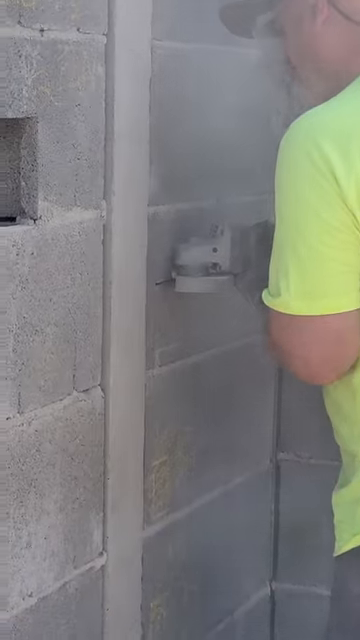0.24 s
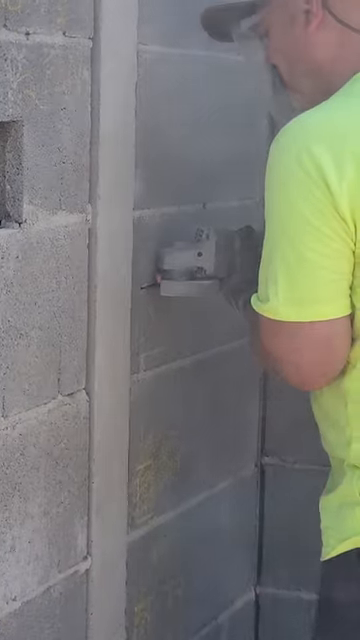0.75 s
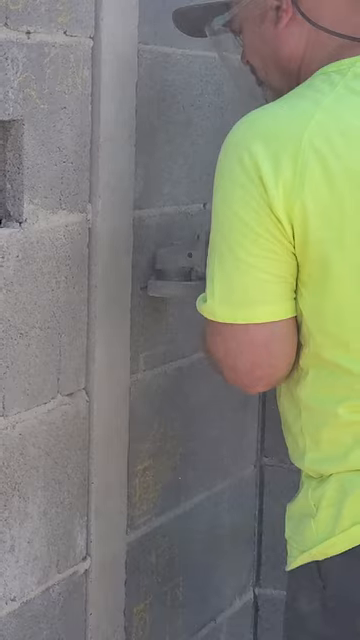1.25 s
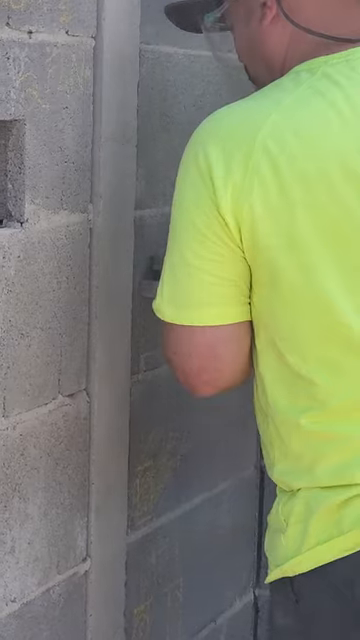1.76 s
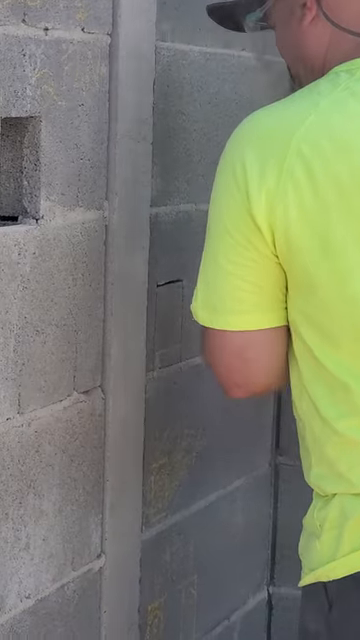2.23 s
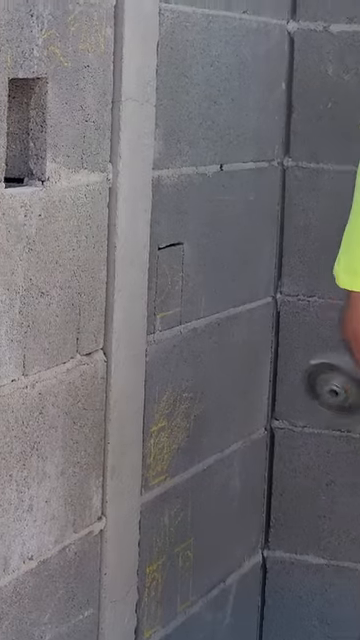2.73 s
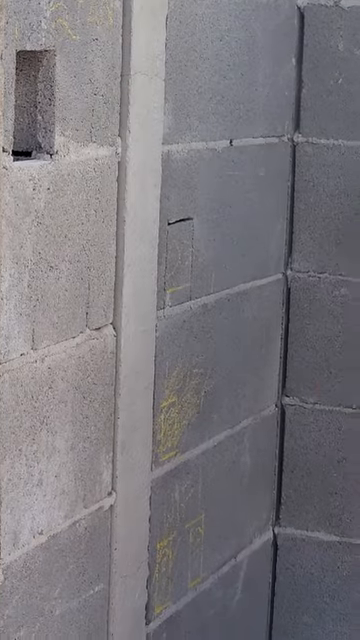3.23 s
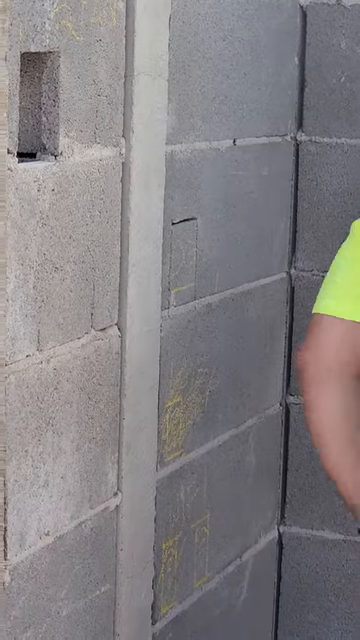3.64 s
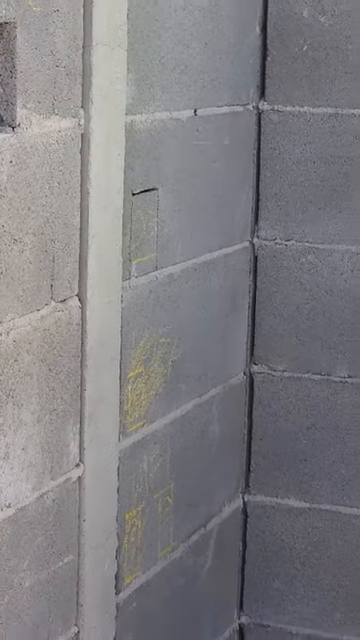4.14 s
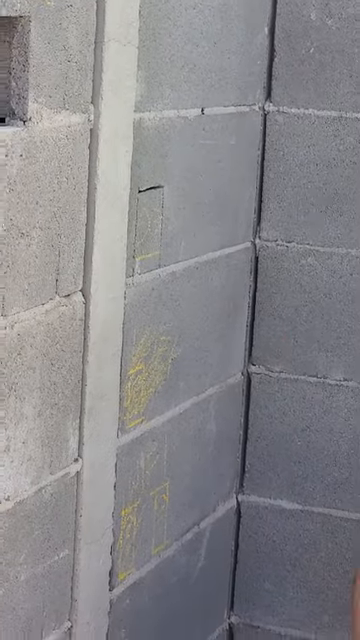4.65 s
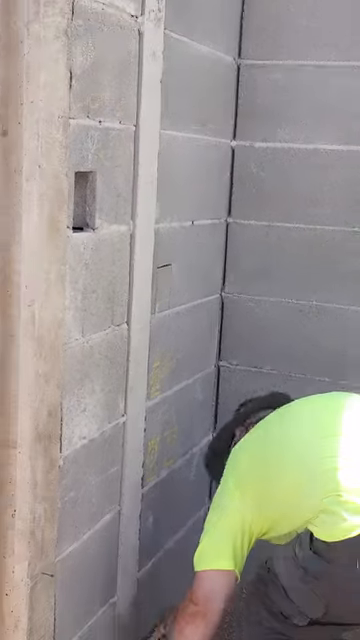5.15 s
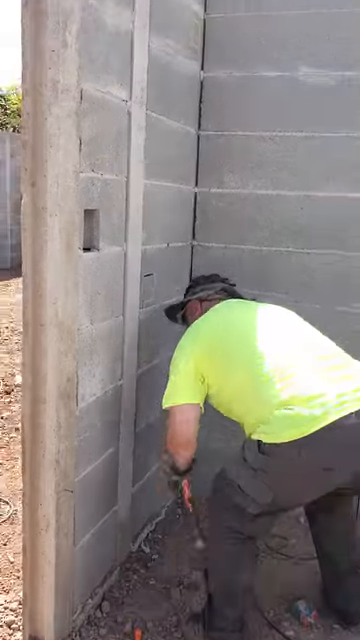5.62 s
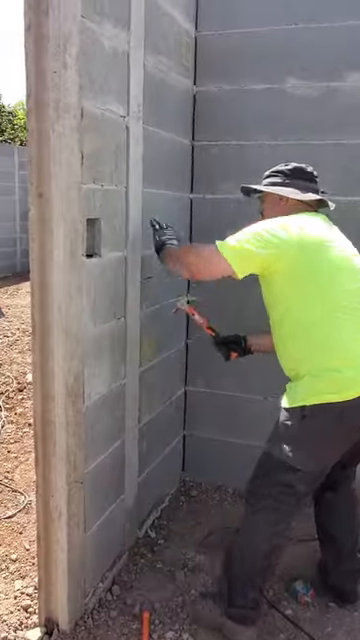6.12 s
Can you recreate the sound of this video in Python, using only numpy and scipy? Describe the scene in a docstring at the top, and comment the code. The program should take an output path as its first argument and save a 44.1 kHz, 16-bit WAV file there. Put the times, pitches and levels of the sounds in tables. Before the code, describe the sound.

From the start an angle grinder bites into concrete: a loud, gritty, high metallic screech with ragged squeal, pressed in uneven pushes until about 1.9 seconds, above a rushing motor. Power goes off near 1.7 seconds; the disc leaves the slot and the motor coasts down, its airy whirr, gear rattle and howl sinking and fading through the rest. Hard knocks land at irregular moments, early ones partly under the cutting, clearer ones around 2.1, 2.4, 3.5, 3.9, 4.4, 5.2 and 5.6 seconds; those near 3.5, 4.4 and 5.2 set steel ringing. Tiny sharp pings tick unevenly close to the microphone, loudest from 2.2 to 3 seconds, higher-pitched around 4.3 to 5, then sparse. A hand tool clinks twice on stony ground near 5.4 seconds. Low wind gusts bump the microphone throughout, over faint yard hush, with short hard-wall reflections.

```python
"""In an unroofed corner of block walls, an angle grinder cuts a slot in concrete, then coasts down.
The cut is noise ringing the disc's resonances; the motor is air noise, gear rattle and tones that sink.
Hard, close knocks are short bursts of filtered noise; some set steel ringing, and a hand tool clinks.
Uneven ticking is made of tiny pings close to the microphone. Gusts of low noise bump it, over a yard hush.
Delayed copies and random reflections make the echo of the walls."""
import sys
import numpy as np
from scipy import signal
from scipy.fft import rfft, irfft, next_fast_len
from scipy.io import wavfile
from scipy.ndimage import map_coordinates

SR = 44100
rng = np.random.default_rng(int(sys.argv[2]) if len(sys.argv) > 2 else 0)


def bounce(signal):
    """Save signal as a 16-bit WAV file at the path given by the first command-line argument."""
    frames = np.transpose(np.atleast_2d(signal))
    limited = np.clip(frames, -1, 1)
    pcm = np.round(limited * 32767).astype(np.int16)
    wavfile.write(sys.argv[1], SR, pcm)


N = 281358
TIME = np.arange(N) / SR
# added to the left channel and taken from the right, to widen a sound
OPPOSITE = np.array([[1], [-1]])

# All levels are relative: later gains still set the mix. A "t60" is the time to fall by 60 dB.
# Resonances of the disc in the cut. Each row: pitch in Hz, width in Hz, level in dB.
DISC_MODES = [(3060, 40, -8), (3840, 100, -1), (4020, 150, -10), (4382, 50, -3.5), (4931, 20, 6.5),
              (5873, 150, -9), (7045, 110, -2.5), (8253, 40, -7), (8600, 250, -15), (8995, 14, 2),
              (9690, 18, 1), (10880, 14, 0), (11359, 70, -5), (11854, 100, -12), (12893, 40, -9),
              (13830, 320, -13)]
# Spectrum of the breaking grit. Each row: frequency in Hz, level in dB per Hz.
GRIT_SPECTRUM = [(1180, -16.5), (2000, -10), (2730, -12), (3050, 9), (3570, -15), (3860, 2.5), (4590, -11),
                 (4910, 8.5), (5500, -7), (9310, -0.5), (10200, -7.5), (11700, 0.5), (15800, -12.5)]
# The disc is pushed into the slot. Each row: start in seconds, length in seconds,
# bite in dB, treble in dB relative to the bite.
PUSHES = [(-0.05, 0.45, -19.5, -3), (0.385, 0.24, -22, -4.5), (0.735, 0.091, -21, 0.5),
          (0.951, 0.041, -20.5, -1), (1.02, 0.41, -23.5, -4), (1.257, 0.33, -21.5, -1),
          (1.565, 0.15, -23, -4), (1.714, 0.1, -27, -6), (1.86, 0.092, -29, -1)]
PUSH_ATTACK_S, PUSH_T60_S = 0.056, 0.28
# Between pushes the disc only rubs; then it is drawn out of the slot. Treble is relative to the rub.
RUB_DB, RUB_TREBLE_DB = -28.5, -5.5
DRAW_OUT_S, DRAW_OUT_T60_S = 1.76, 1.5
# The squeal of the disc's strongest mode bends with the load. Each row: time in seconds,
# pitch in Hz, level in dB.
SQUEAL_CURVE = [(0.0, 3820, -16), (0.352, 3824, -19), (0.428, 3820, -31), (0.858, 3840, -20.5),
                (0.928, 3830, -47), (1.042, 3844, -21), (1.111, 3855, -32), (1.378, 3845, -14),
                (1.846, 3860, -21), (1.878, 3850, -41), (1.928, 3850, -29), (1.949, 3800, -34)]
# The screech reaches the left microphone first.
SCREECH_LEAD_S = 0.00048

# Armature speed in turns per second under power, and the moment it is switched off.
RUN_HZ, SWITCH_OFF_S = 508, 1.68
# Speed lost to bearing friction each second, and the speed at which the fan's drag equals it.
FRICTION_HZ_PER_S, DRAG_EQUAL_HZ = 37.1, 304
# Motor tones. Each row: multiple of the armature speed, level in dB, flicker in dB.
WHINE_TONES = [(1, -19, 3), (2, -21, 4), (4, -20, 4), (18, -4, 3.2)]
# Ragged strands of the gear howl. Each row: multiple of the armature speed, level in dB at full speed,
# level in dB at half speed, width as a share of the pitch.
HOWL_STRANDS = [(.9, -14, -26, .04), (3.3, -11, -22, .012), (6.2, -28, -10, .012), (7.05, -13, -21, .008),
                (9.6, -9, -18, .008), (11, -9, -13, .014), (12.1, -22, -10, .014), (18.15, -26, -14, .006)]
# Cooling air and gears as the tool is moved about. Each row: time in seconds, level of the highs in dB,
# level of the lows in dB.
AIR_LEVELS = [(0.0, -30.5, -35), (0.43, -33.5, -34.5), (0.76, -29, -33.5), (1.22, -29, -31),
              (1.51, -35, -36), (2.36, -33.5, -38.5), (2.88, -32, -39.5), (3.2, -36.5, -39),
              (3.39, -37, -36.5), (3.71, -33, -40.5), (4.03, -35, -39), (4.25, -38, -46.5),
              (4.36, -35, -50), (4.62, -39.5, -39), (4.74, -39, -47.5), (5.05, -46, -46.5),
              (5.58, -48, -49.5), (5.85, -50.5, -55), (6.38, -56.5, -57)]
# Spectrum of the air rush. Each row: frequency in Hz, level in dB per Hz.
AIR_SPECTRUM = [(150, -18), (400, 1), (560, -0.5), (800, -1.5), (1050, 7), (1300, 7), (1800, 2), (2600, 3),
                (4000, -6.5), (6000, -13), (9000, -11), (13000, -2), (16000, -27)]
# Spectrum of the fan's hiss at full speed. Each row: frequency in Hz, level in dB per Hz.
FAN_SPECTRUM = [(1500, -29), (4000, 2), (5500, 5.5), (7000, 4), (10000, -3), (13000, -7), (16000, -45)]
# Resonances of the housing and guard. Each row: pitch in Hz, width in Hz, level in dB.
HOUSING_MODES = [(790, 210, 1.5), (1400, 500, -4), (2480, 500, -4), (8450, 270, -24)]
# The gears' rattle at full speed. Each row: pitch in Hz, width in Hz, level in dB.
GEAR_MODES = [(1045, 200, -8.5), (1727, 230, 6), (2082, 150, 3), (2400, 110, 0), (3430, 150, 1),
              (4580, 630, 2.5)]
# The gears rattle more loosely as they slow: typical level swing near standstill.
RATTLE_DB = 2.5
# Fine ridges in the air rush: spacing at full speed, and typical depth.
RIDGE_HZ, RIDGE_DB = 60, 5.0
# Echo of the moving grinder off the nearest surface. Each row: time in seconds, lag in milliseconds,
# strength from 0 to 1.
NEAR_ECHO = [(0, 1.4, .35), (3.4, 1.52, .45), (3.6, .98, .35), (4.35, .75, .75), (4.7, .77, .8),
             (6.38, .85, .2)]
# Sound paths off the block walls. Each row: lag in milliseconds, strength (below 0 flips the wave).
WALL_ECHOES = [(1.85, -0.19), (7.3, 0.18), (12.6, 0.2)]

# Knocks on masonry. Each row: start in seconds, thud in dB, body in dB, crack in dB, sizzle in dB,
# top of the sizzle in Hz, length of the crunch in seconds, main resonance in Hz, its level in dB,
# low rumble after it in dB.
KNOCKS = [ (0.236, -17.5, -17.5, -30, -45, 8000, 0.013, 905, -36, -39),
          (0.457, -22, -28.5, -47, -56, 8000, 0.0053, 209, -33, -38),
          (0.593, -19, -20, -32, -50, 8000, 0.0035, 326, -22, -27),
          (1.455, -24.5, -35, -49, -56, 8000, 0.023, 240, -40, -37.5),
          (2.077, -10, -16.5, -28.5, -31, 7000, 0.008, 381, -29, -30.5),
          (2.367, -13, -20.5, -33, -24, 15000, 0.012, 258, -42, -27.5),
          (2.73, -50, -27.5, -38, -36, 8000, 0.033, 1230, -30, -38),
          (3.466, -17, -19.5, -27, -23, 14100, 0.019, 497, -33, -24.5),
          (3.881, -29, -14.5, -18.5, -22.5, 7900, 0.012, 932, -17.5, -33),
          (4.048, -44, -34, -37, -66, 5900, 0.0076, 774, -32, -60),
          (4.31, -22.5, -54, -56, -60, 6000, 0.0039, 130, -46, -58),
          (4.390, -19.5, -26.5, -34, -30, 14000, 0.028, 365, -32, -23.5),
          (4.734, -24, -45, -52, -58, 6000, 0.011, 290, -41, -53),
          (5.227, -32, -16.5, -36, -21, 14000, 0.011, 485, -30, -31),
          (5.626, -31, -17, -26.5, -34, 6500, 0.026, 1360, -30, -45)]
KNOCK_T60_S = 0.12
# Resonances of the knocked block. Each row: pitch in Hz, width in Hz, level in dB.
BLOCK_MODES = [(214, 79, 4), (313, 41, 7), (393, 74, 6.5), (480, 82, 0.5), (648, 61, 5.5), (946, 66, 7.5),
               (1134, 90, 2.5), (1272, 64, 6.5), (1381, 36, 6.5), (1525, 163, 4.5), (2080, 1350, -8.5)]
# High resonances of the knocked block. Each row: pitch in Hz, width in Hz, level in dB.
CRACK_MODES = [(1810, 120, -12.5), (1950, 32, -6), (2176, 41, 4), (2538, 41, 1.5), (2896, 92, 1.5),
               (3077, 29, 4.5), (3500, 84, -5)]
# Steel struck along with a knock. Each row: start in seconds, level in dB,
# extra damping by the contact in 1/s.
CLANGS = [(3.468, -26.5, 30), (4.393, -22, 0), (5.228, -24, 20)]
# Ringing modes of the steel. Each row: pitch in Hz, level in dB, t60 in seconds.
STEEL_MODES = [(1295, -8, .35), (1520, 2, 1.1), (1610, -4, .4), (1965, -13, .8), (2326, -18, .4),
               (2820, -13, .29), (3036, -0.5, .5), (3130, -9, .4), (3600, -1, .33), (4080, -4, .27),
               (4583, -7, .42), (5130, -13, .6), (5633, -3, .28), (6245, -1, .22), (6838, -3, .26),
               (7445, -11, .28), (8100, -11, .24), (8635, -9, .27), (9290, -12, .32), (12060, -10, .35),
               (12850, -14, .22), (13600, -13, .45)]
# A hand tool clinks on the stony ground. Each row: start in seconds, level in dB,
# tilt towards the high modes in dB per octave, length of the scuff in seconds.
CLINKS = [(5.408, -24.5, 8, 0.0063), (5.4524, -17, 0.5, 0.014)]
# What rings in a clink. Each row: pitch in Hz, width in Hz, level in dB.
CLINK_MODES = [(417, 210, -8), (1010, 550, -12), (1770, 160, -5), (2420, 130, -0.5), (2965, 80, 3.5),
               (3300, 68, 0), (3710, 120, -4), (4550, 380, -11), (5450, 120, -9), (5920, 88, -1),
               (6240, 220, -6), (7000, 120, -9.5), (8000, 420, -18), (11100, 1000, -27)]
CLINK_T60_S = 0.079

# How the scattered ticks change. Each row: time in seconds, peak in dB, treble in dB relative to it,
# share of ticks on the upper resonance from 0 to 1.
SCATTERED_TICKS = [(0, -45, 8, 0.1), (2.0, -36, 5.5, 0), (2.4, -21.5, -8, 0.07), (2.85, -20, -8, 0.1),
                   (3.2, -25, -10.5, 0.01), (3.7, -24, -9, 0.2), (4.3, -30, -2.5, 0.96),
                   (4.85, -30, -1, .95), (5.2, -37.5, 0, 0.62), (5.85, -33.5, -4.5, 0.3),
                   (6.38, -35.5, -5, 0.36)]
# Single ticks with set times, many of them loud. Each row: start in seconds, peak in dB, pitch in Hz,
# treble in dB relative to the peak.
SINGLE_TICKS = [(2.1914, -15, 4120, -19), (2.279, -14.5, 4040, -22), (2.507, -17.5, 3860, -18),
                (2.5332, -13.5, 3900, -27), (2.6199, -16.5, 3680, -11), (2.7023, -14, 4760, -9),
                (2.7521, -17, 4000, -13), (2.8512, -20, 3830, -13), (2.8973, -17, 3880, -9),
                (2.9524, -16, 4270, -19), (2.9814, -12, 3850, -25), (3.13, -21, 3790, -23),
                (3.7693, -28, 3630, -20), (3.8462, -22, 3730, -6), (4.002, -25, 4300, -6),
                (4.299, -27, 3770, -8), (4.799, -25, 5160, -18), (4.8294, -26, 5200, -13),
                (4.8663, -27, 5300, -5), (4.95, -21, 4700, -23), (4.9865, -25, 4980, -7),
                (5.0126, -22.5, 4040, -1), (5.036, -24.5, 4330, -10), (5.1166, -32, 5170, -3),
                (5.1921, -40, 5100, 5), (5.7658, -36, 3970, -11), (5.8591, -28.5, 3850, -19),
                (5.9678, -36, 3880, -5), (6.0815, -46, 3920, -10), (6.22, -42, 5140, -8),
                (6.249, -28.5, 3880, -11), (6.327, -40, 3980, -4)]
# Modes that ring along with every tick. Each row: pitch in Hz, level in dB, t60 in seconds.
TICK_MODES = [(3835, -4, 0.022), (4390, 1, 0.025), (5000, -11.5, 0.048), (8200, -15, 0.16),
              (9700, -4.5, 0.027), (10710, 4.5, 0.037), (11350, -0.5, 0.031), (12250, 2, 0.036)]
LOW_TICK_HZ, HIGH_TICK_HZ = 3890, 5114

# Gusts on the microphone. Each row: start in seconds, length in seconds, level in dB.
GUSTS = [(0.417, 0.07, -22), (0.517, 0.12, -20), (0.692, 0.1, -24.5), (0.896, 0.18, -30),
         (1.855, 0.28, -31), (2.406, 0.13, -34), (2.525, 0.083, -21), (3.236, 0.036, -23),
         (3.466, 0.59, -30), (4.114, 0.15, -23.5), (4.45, 0.19, -21.5), (4.91, 0.72, -33),
         (5.48, 0.3, -26.5), (5.991, 0.042, -26)]
GUST_ATTACK_S, GUST_T60_S, BREEZE_DB = 0.017, 0.27, -38.5
# Spectrum of the wind. Each row: frequency in Hz, level in dB per Hz.
WIND_SPECTRUM = [(15, 5), (30, -14), (55, 3), (76, 3.5), (110, -5), (170, -8.5), (260, -17.5), (450, -29.5),
                 (900, -43)]
# Strength of the echoes from the side. Each row: frequency in Hz, level in dB.
SIDE_SPECTRUM = [(100, -14), (350, -17.5), (700, -9.5), (1300, -6), (2400, -2.5), (4400, -0.5),
                 (8000, -0.5), (15000, 2.5)]
# Spectrum of the yard's hush. Each row: frequency in Hz, level in dB per Hz.
YARD_SPECTRUM = [(150, -14), (400, 2), (1200, 8), (1900, -42), (2800, 7), (3400, 8), (6000, 3.5),
                 (7400, -41), (8100, -3), (8800, -6), (13000, -3), (16000, -24)]
YARD_DB = -47
# Top of the finished sound.
CUTOFF_HZ = 15900


def cutting(turns, gear_ratio=4.8, wobble_db=-1.0, chatter_db=1.55, grain_db=3.5, mode_swing_db=3.0):
    """Grit breaks under the rim, harder once per disc turn, and rings disc modes that swell and bend."""
    bite, treble_bite = feed()
    # the gears turn the disc slower than the armature
    once_per_turn = np.sin(2 * np.pi * turns / gear_ratio)
    pressure = from_db(wobble_db * once_per_turn + chatter_db * drift(220))
    grains = noise() * pressure * from_db(grain_db * drift(6000))
    ringing = np.zeros(N)
    for k, mode in enumerate(DISC_MODES):
        ringing += (-1) ** k * resonate(grains, [mode]) * from_db(mode_swing_db * drift(14.22))
    ringing = sink(ringing, 1 + 0.0008 * drift(12))
    grit = colour(noise() * pressure, GRIT_SPECTRUM)
    cut = from_db(4.5) * rms_one(ringing) + from_db(2.0) * rms_one(grit)
    treble = colour(cut, [(7000, -40), (8000, 0)])
    lower_part = bite * from_db(0.7 * drift(39.2)) * rms_one(cut - treble)
    upper_part = treble_bite * from_db(3.5) * rms_one(treble)
    return lower_part + upper_part + squeal(pressure)


def feed():
    """Strength of the screech and of its treble: light rubbing plus each push, summed in power."""
    strokes = [(burst(0, DRAW_OUT_S, DRAW_OUT_T60_S), RUB_DB, RUB_TREBLE_DB)]
    for s, length, db, treble_db in PUSHES:
        strokes.append((swell(s, length, PUSH_ATTACK_S, PUSH_T60_S), db, treble_db))
    return np.sqrt(sum((shape * from_db([[db], [db + treble_db]])) ** 2 for shape, db, treble_db in strokes))


def squeal(pressure, level_db=-6.0, jitter_hz=70, rough_db=3.0):
    """A ragged tone that flares as the rim grabs and dies away once the disc is out of the slot."""
    hz, db = in_time(SQUEAL_CURVE)
    tone = np.sin(2 * np.pi * np.cumsum(hz + jitter_hz * drift(500)) / SR)
    ragged = rms_one(tone * pressure * from_db(rough_db * drift(200)))
    return from_db(db + level_db) * ragged * burst(0, SQUEAL_CURVE[-1][0], PUSH_T60_S)


def armature_speed():
    """Steady under power; then the fan's drag and the bearings' friction brake it."""
    coasted_s = np.maximum(TIME - SWITCH_OFF_S, 0)
    start_angle = np.arctan(RUN_HZ / DRAG_EQUAL_HZ)
    return DRAG_EQUAL_HZ * np.tan(start_angle - coasted_s * FRICTION_HZ_PER_S / DRAG_EQUAL_HZ)


def motor(speed, tones, flutter_db=1.11, fan_db_per_octave=8, gears_db=-4):
    """Lower air rush, fan, gears and tones sink as the armature slows; housing and air treble keep pitch."""
    highs_db, lows_db = in_time(AIR_LEVELS)
    pace = speed / speed.max()
    low_air = colour(ridged_noise(pace) * np.sqrt(pace), [(5000, 0), (6500, -30)])
    high_air = colour(noise(), [(5000, -30), (6000, 0)])
    air = rms_one(colour(low_air + high_air, AIR_SPECTRUM))
    housing = from_db(-5.5) * rms_one(resonate(noise(), HOUSING_MODES))
    hiss = sink(rms_one(colour(noise(), FAN_SPECTRUM)), pace)
    fan = hiss * from_db(4.5 + fan_db_per_octave * np.log2(pace))
    gears = from_db(gears_db) * sink(rms_one(resonate(noise(), GEAR_MODES)), pace)
    slack = from_db(RATTLE_DB * (1 - pace) * drift(70))
    sound = (air + housing + fan + gears + tones) * from_db(flutter_db * drift(150)) * slack
    # each path also returns the echoes made before it, a little duller
    for lag_ms, strength in [in_time(NEAR_ECHO)] + WALL_ECHOES:
        dull = np.convolve(sound, [.1, .24, .32, .24, .1], "same")
        sound = sound + strength * np.interp(TIME - lag_ms / 1000, TIME, dull)
    lows = colour(sound, [(1600, 0), (2000, -40)])
    return lows * from_db(lows_db + 1.5) + (sound - lows) * from_db(highs_db)


def ridged_noise(pace):
    """Noise with fine, uneven ridges in its spectrum, all gliding down with the speed."""
    hz = np.arange(RIDGE_HZ, SR / 2, RIDGE_HZ)
    ridges = np.transpose([hz, RIDGE_DB * rng.standard_normal(len(hz))])
    return sink(colour(noise(), ridges), pace)


def whine(speed, turns):
    """Flickering tones at whole multiples of the armature speed, weaker as it slows."""
    tones = np.zeros(N)
    for multiple, db, flicker_db in WHINE_TONES:
        tones += from_db(db + flicker_db * drift(45)) * np.sin(2 * np.pi * multiple * turns)
    return tones * np.square(speed / RUN_HZ)


def howl(speed, turns):
    """Narrow noise bands ride on multiples of the speed; their balance shifts as the gears unload."""
    octaves_slowed = np.clip(np.log2(RUN_HZ / speed), 0, 1)
    out = np.zeros(N)
    for multiple, full_db, half_db, width in HOWL_STRANDS:
        phase = 2 * np.pi * multiple * turns
        drifts_per_s = 2 * width * multiple * speed.mean()
        strand = drift(drifts_per_s) * np.sin(phase) + drift(drifts_per_s) * np.cos(phase)
        out += from_db(full_db + (half_db - full_db) * octaves_slowed) * strand
    return out


def knocks(thud_hz=78, first_contact_db=1, ring_cycles=110, rumble_t60=0.61, crumble_db=2.0):
    """Each blow snaps and crumbles: thud, block body, crack, grit sizzle, one resonance, low rumble."""
    crumbs = from_db(crumble_db * drift(400))
    layers = [band(noise(), 77, 285), resonate(noise(), BLOCK_MODES), resonate(noise() * crumbs, CRACK_MODES),
              band(noise() * crumbs, 2700, CUTOFF_HZ), band(noise(), 117, 560)]
    layers = np.array([rms_one(layer) for layer in layers])
    out = np.zeros(N)
    for s, thud_db, body_db, crack_db, sizzle_db, top_hz, hold, ring_hz, ring_db, rumble_db in KNOCKS:
        span = slice(int(s * SR), int(s * SR) + SR)
        age = TIME[span] - s
        boom, body, crack, grit, rumble = layers[:, span]
        thud = from_db(thud_db) * (np.sin(2 * np.pi * thud_hz * age) + 0.5 * boom)
        sizzle = signal.sosfilt(signal.butter(2, top_hz, fs=SR, output="sos"), grit)
        crunch = from_db(body_db) * body + from_db(crack_db) * crack + from_db(sizzle_db) * sizzle
        snap = from_db(first_contact_db * dying(age, 0.00067, 0.0052))
        ring = from_db(ring_db + 3.0) * np.sin(2 * np.pi * ring_hz * age)
        out[span] += (thud + crunch * snap) * dying(age, hold, KNOCK_T60_S)
        out[span] += ring * dying(age, hold, min(ring_cycles / ring_hz, 0.14))
        out[span] += from_db(rumble_db) * rumble * dying(age, 0, rumble_t60)
    return out


def steel(scatter_db=-0.5):
    """Steel rings on after a blow, each mode with a strength of its own; firm contact shortens the ring."""
    hz, mode_db, t60 = np.array(STEEL_MODES).T[:, :, None]
    age = np.arange(SR) / SR
    out = np.zeros(N + SR)
    for s, db, damping in CLANGS:
        level_db = db + mode_db + scatter_db * rng.standard_normal(hz.shape)
        decay = np.exp(-age * (np.log(1000) / t60 + damping))
        waves = np.sin(2 * np.pi * (hz * age + rng.random(hz.shape)))
        start = int(s * SR)
        out[start:start + SR] += np.sum(from_db(level_db) * decay * waves, axis=0)
    return out[:N]


def clinks(settle_db=-22, settle_t60=0.45):
    """A short gritty scuff sets the tool ringing; loose stones settle after it."""
    out = np.zeros(N)
    for s, db, tilt_db, hold in CLINKS:
        lowest_hz = CLINK_MODES[0][0]
        modes = [(hz, width, mode_db + tilt_db * np.log2(hz / lowest_hz)) for hz, width, mode_db in CLINK_MODES]
        scuff = noise() * from_db(2.5 * drift(900))
        shape = burst(s, hold, CLINK_T60_S) + from_db(settle_db) * burst(s, 0, settle_t60)
        out += from_db(db) * shape * rms_one(resonate(scuff, modes))
    return out


def ticking(gap_s=0.018, uneven=0.33, spread_db=3):
    """Single ticks at set times, many of them loud, join an uneven rattle about two resonances."""
    draws, chance = rng.standard_normal((600, 3)), rng.random(600)
    times = np.cumsum(gap_s * np.exp(uneven * draws[:, 0]))
    curve = np.transpose(SCATTERED_TICKS)
    level_db, treble_db, high_share = [np.interp(times, curve[0], column) for column in curve[1:]]
    pitch = np.where(chance < high_share, HIGH_TICK_HZ, LOW_TICK_HZ) * (1 + 0.01 * draws[:, 2])
    # the limit of 1 keeps scattered ticks from jumping out
    level_db = level_db + spread_db * np.minimum(draws[:, 1], 1)
    scattered = np.transpose([times, level_db, pitch, treble_db])[times < N / SR]
    out = np.zeros(N + SR)
    for s, db, hz, top_db in list(SINGLE_TICKS) + list(scattered):
        sound, start = tick(db, hz, top_db), int(s * SR)
        out[start:start + len(sound)] += sound
    return out[:N]


def tick(db, hz, treble_db, rise_s=0.0016, hold_s=0.0024, main_t60=0.046, detune=0.008,
         scatter_db=3, rasp_db=-11, sharp=0.014, settle_s=0.0023):
    """A ping that starts sharp and settles, with a chance mix of the shared modes and a little rasp."""
    age = np.arange(SR // 16) / SR
    bent_age = age + sharp * settle_s * (1 - np.exp(-age / settle_s))
    mode_hz, mode_db, t60 = np.array(TICK_MODES).T[:, :, None]
    mode_db = mode_db + (mode_hz > 7000) * treble_db + scatter_db * rng.standard_normal(mode_hz.shape)
    mode_hz = mode_hz * (1 + 0.012 * rng.standard_normal(mode_hz.shape))
    mode_fade = np.exp(-np.log(1000) * age / t60)
    modes = np.sum(from_db(mode_db) * mode_fade * np.sin(2 * np.pi * mode_hz * bent_age), axis=0)
    ping = np.sin(2 * np.pi * hz * (1 + detune * rng.standard_normal()) * bent_age)
    rasp = rms_one(np.convolve(rng.standard_normal(len(age)), [1, 2, 1, -1, -2, -1], "same"))
    fade = np.exp(-np.log(1000) * np.maximum(age - hold_s, 0) / main_t60)
    struck = (ping + from_db(rasp_db) * rasp) * fade
    return from_db(db - 5.0) * np.minimum(age / rise_s, 1) * (struck + modes)


def wind(lumpy_db=3.0, apart=0.82):
    """Gusts rise out of a light breeze and thump on the microphone, partly different at each port."""
    power = from_db(BREEZE_DB) ** 2
    for s, length, db in GUSTS:
        power = power + (from_db(db) * swell(s, length, GUST_ATTACK_S, GUST_T60_S)) ** 2
    shared, own = [rms_one(colour(noise(), WIND_SPECTRUM) * from_db(lumpy_db * drift(35))) for _ in range(2)]
    return np.sqrt(power) * from_db(-1.87) * (shared + apart * own * OPPOSITE)


def yard_hush():
    """Steady coloured noise, independent in each channel."""
    return from_db(YARD_DB) * rms_one(colour(np.array([noise(), noise()]), YARD_SPECTRUM))


def corner(x, sideways, wet_db, t60):
    """Sound thrown sideways returns off the near walls and widens; the open corner adds a short tail."""
    side = colour(scatter(sideways, longest_s=0.014), SIDE_SPECTRUM)
    tail = np.array([echoes(x, first_s=0.008, t60=t60) for _ in range(2)])
    return x + side * OPPOSITE + from_db(wet_db) * tail


def scatter(x, longest_s):
    """Rough walls return each pitch after a delay of its own, all equally strong."""
    size = next_fast_len(N + 4096)
    hz = np.fft.rfftfreq(size, 1 / SR)
    delay = longest_s * np.interp(hz, np.linspace(0, SR / 2, 300), rng.random(300))
    # adding up delay over frequency gives the phase turn
    turn = np.exp(-2j * np.pi * np.cumsum(delay) * hz[1])
    return irfft(rfft(x, size) * turn, size)[:N]


def echoes(x, first_s, t60):
    """A cloud of random, dying reflections of unit energy."""
    age = np.arange(int(t60 * SR)) / SR
    cloud = rng.standard_normal(len(age)) * from_db(-60 * age / t60)
    cloud = np.pad(cloud / np.linalg.norm(cloud), (int(first_s * SR), 0))
    return signal.fftconvolve(x, cloud)[:N]


def from_db(db):
    """Decibels to gain."""
    return np.exp(np.asarray(db) * (np.log(10) / 20))


def rms_one(x):
    """Scale to an average strength (rms) of one."""
    return x / np.sqrt(np.mean(x ** 2) + 1e-20)


def in_time(rows):
    """The columns of a curve at every sample."""
    s, *columns = np.transpose(rows)
    return [np.interp(TIME, s, column) for column in columns]


def noise():
    """White noise."""
    return rng.standard_normal(N)


def drift(per_s):
    """A random wandering curve of unit rms, with per_s new random points each second."""
    knots = rng.standard_normal(int(N / SR * per_s) + 2)
    return rms_one(np.interp(TIME * per_s, np.arange(len(knots)), knots))


def colour(x, spectrum):
    """Filter by a smooth spectrum."""
    hz, db = np.transpose(spectrum)
    size = next_fast_len(N + 4096)
    bins = np.maximum(np.fft.rfftfreq(size, 1 / SR), 1)
    gain = from_db(np.interp(np.log(bins), np.log(hz), db))
    return irfft(rfft(x, size) * gain, size)[..., :N]


def band(x, low_hz, high_hz):
    """Keep mainly the pitches between two limits."""
    return signal.sosfilt(signal.butter(2, [low_hz, high_hz], "band", fs=SR, output="sos"), x)


def resonate(x, modes):
    """Parallel resonances with alternating signs."""
    out = np.zeros(N)
    for k, (hz, width, db) in enumerate(modes):
        r = np.exp(-np.pi * width / SR)
        poles = [1, -2 * r * np.cos(2 * np.pi * hz / SR), r * r]
        gain = (-1) ** k * from_db(db) * (1 - r * r) / 2
        out += gain * signal.lfilter([1, 0, -1], poles, x)
    return out


def sink(x, pace):
    """Play a sound at a changing pace, which multiplies every pitch by that factor."""
    return map_coordinates(x, [np.cumsum(pace)], order=3)


def dying(age, hold, t60):
    """Full strength while held, then an exponential decay."""
    return from_db(-60 * np.clip((age - hold) / t60, 0, 3))


def burst(start, hold, t60):
    """Envelope that jumps up, holds and dies away."""
    return (TIME >= start) * dying(TIME - start, hold, t60)


def swell(start, length, attack, t60):
    """Envelope that rises over the attack and dies away once its length is over."""
    return np.clip((TIME - start) / attack, 0, 1) * burst(start, length, t60)


def radiate(front, flank, width_db, shared=0.62):
    """The grinder sends partly different noise to the front and to the side."""
    sideways = shared * front + np.sqrt(1 - shared ** 2) * flank
    return corner(front, from_db(width_db) * sideways, wet_db=-11.5, t60=0.33)


def scene():
    """Grinder, knocks and ticks between the walls, with wind and the hush of the yard."""
    speed = armature_speed()
    unsteady = 1 + 0.0013 * drift(120) + 0.0005 * drift(7)
    turns = np.cumsum(speed * unsteady) / SR
    left, right = radiate(cutting(turns), cutting(turns), width_db=-1.5)
    right = np.interp(TIME - SCREECH_LEAD_S, TIME, right)
    screech = np.array([left, right]) * from_db([[2.8], [1.8]])
    tones = whine(speed, turns) + howl(speed, turns)
    rush = radiate(motor(speed, tones), motor(speed, tones), width_db=0.0) * from_db([[0.8], [-0.8]])
    blows = knocks() + steel() + clinks()
    close = corner(blows, blows, wet_db=-10, t60=0.25)
    ticks = ticking()
    spread_ticks = from_db(-0.5) * scatter(ticks, longest_s=0.0053) * OPPOSITE
    rattle = ticks * from_db([[3.5], [-2.5]]) + spread_ticks
    return screech + rush + close + rattle + wind() + yard_hush()


def record(dry):
    """The deepest rumble is rolled off, peaks are rounded and the top is cut."""
    dry = signal.sosfilt(signal.butter(2, 22, "high", fs=SR, output="sos"), dry)
    rounded = 1.1 * np.tanh(dry / 1.1)
    return signal.sosfiltfilt(signal.ellip(10, 0.1, 60, CUTOFF_HZ, fs=SR, output="sos"), rounded)


dry = scene()
out = record(dry)
bounce(out)
```